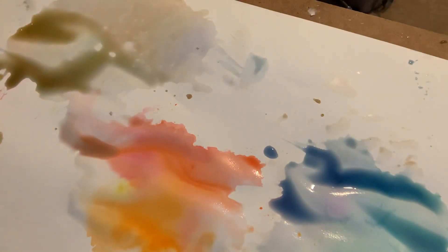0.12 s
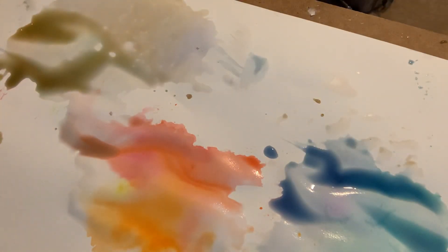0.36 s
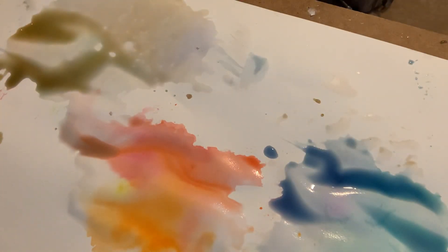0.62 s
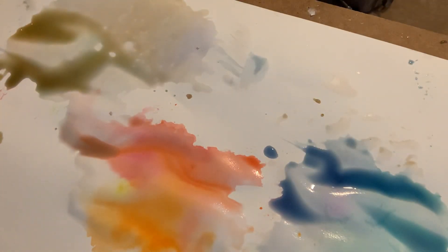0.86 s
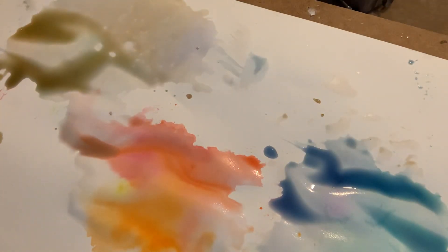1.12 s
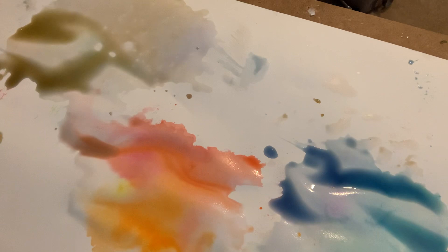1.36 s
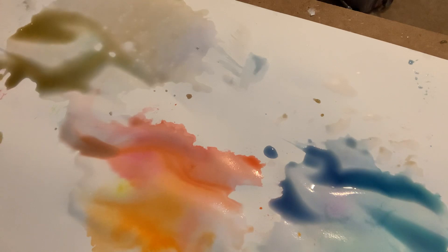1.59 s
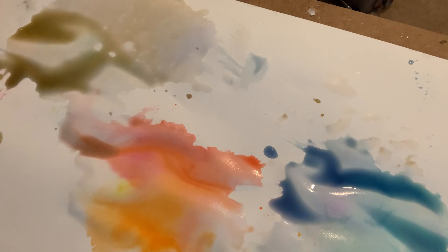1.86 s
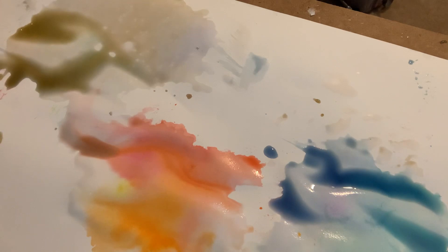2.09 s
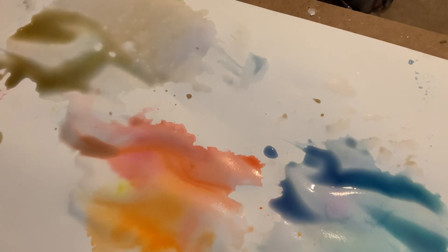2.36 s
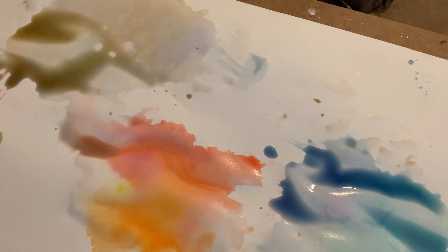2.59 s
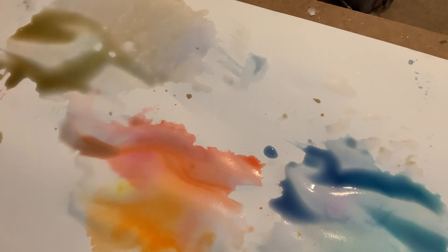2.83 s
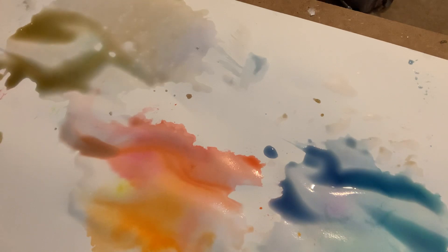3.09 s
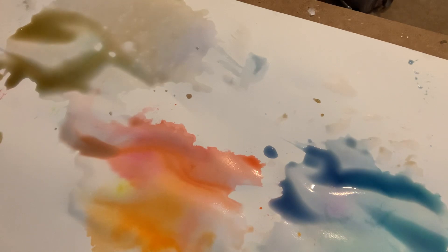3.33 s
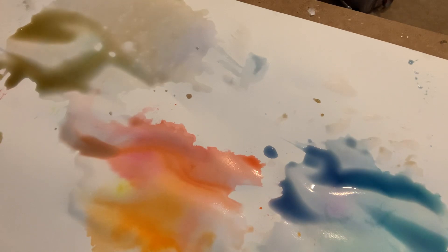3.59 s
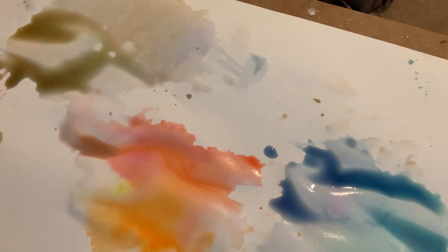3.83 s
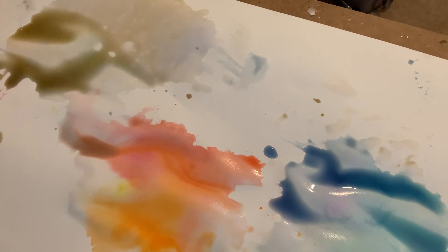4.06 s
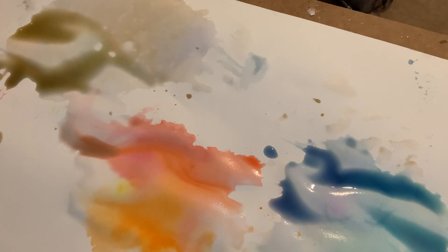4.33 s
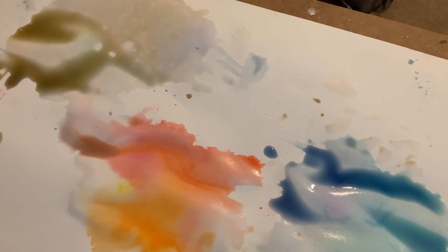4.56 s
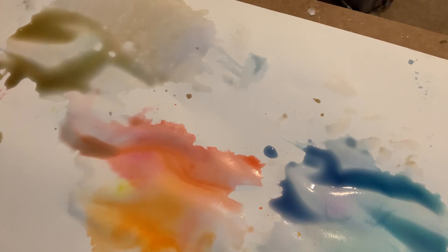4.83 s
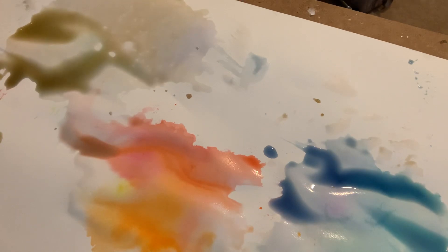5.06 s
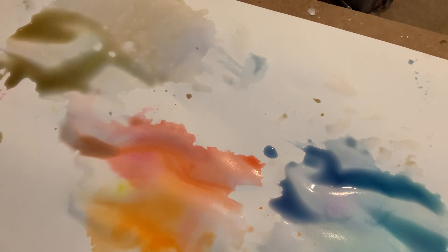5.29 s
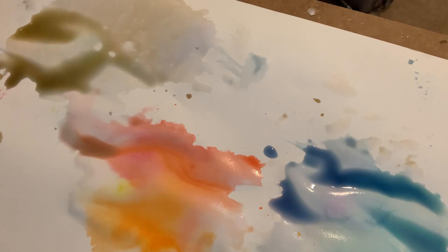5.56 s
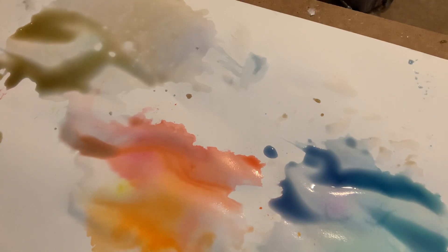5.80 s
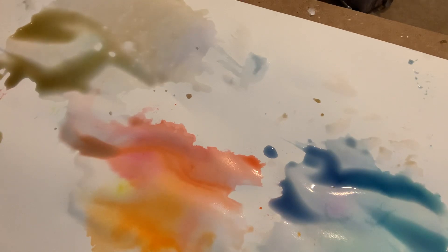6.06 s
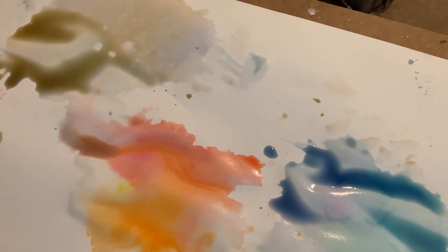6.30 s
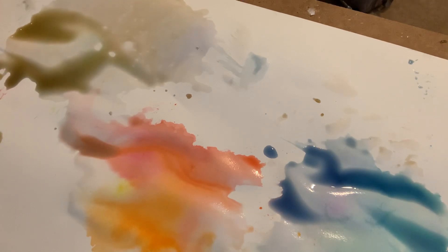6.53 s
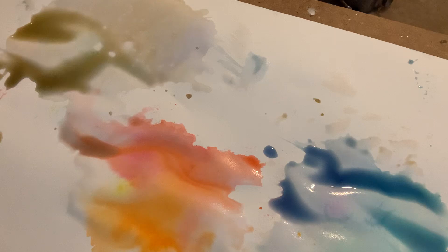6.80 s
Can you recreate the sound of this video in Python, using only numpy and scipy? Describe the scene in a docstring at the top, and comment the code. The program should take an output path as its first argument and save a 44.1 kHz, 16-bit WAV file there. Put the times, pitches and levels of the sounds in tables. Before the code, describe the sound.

Paper is handled on a desk in a small quiet room. Soft, broken rustles and sharp crease snaps come first, with near-silent gaps between them. A longer, busier shuffle follows in the middle with low desk knocks, then a strong, sustained rubbing scrape with snaps closes it. Close stereo pickup, source slightly right, short room tail.

```python
"""Paper shuffled on a desk

Sheets of paper are shuffled, slid and flicked in a small quiet room, to the right of a microphone pair.
Sliding fibres hiss and crackle (shaped noise), and creases snap (bursts of clicks).
The desk booms under the hand (ringing tones), and the room answers each snap with a short tail.
Behind them lie a low rumble, which follows the rubbing, and faint air noise.
"""
import sys
import numpy as np
from scipy import signal
from scipy.fft import irfft
from scipy.io import wavfile
from scipy.ndimage import uniform_filter1d

SR = 44100
rng = np.random.default_rng(int(sys.argv[2]) if len(sys.argv) > 2 else 0)


def elevation(decibels):
    """Turn decibel levels (scalar or array-like) into linear amplitude ratios."""
    levels = np.asarray(decibels, float)
    return 10 ** (levels / 20)


def dump(signal):
    """Clip the signal to [-1, 1] and save it as 16-bit WAV at the path in sys.argv[1]."""
    limited = np.clip(np.atleast_2d(signal).T, -1, 1)
    pcm = np.round(limited * 32767).astype(np.int16)
    wavfile.write(sys.argv[1], SR, pcm)


N = 304731  # length in samples

# how strongly the hand rubs the paper, one list a movement: start_s, level_db (relative)
HAND_MOVES = [
    [(0.0, -73), (0.1, -87), (0.2, -75), (0.3, -90.5)],
    [(0.38, -57.5), (0.5, -62.5), (0.578, -58), (0.8, -56.5), (0.992, -46), (1.044, -62.5), (1.18, -83.5)],
    [(1.33, -57.5), (1.376, -62.5), (1.41, -59.5), (1.5, -68.5), (1.6, -73)],
    [(1.72, -43), (1.76, -54), (1.862, -71.5), (1.95, -100)],
    [(2.016, -69.5), (2.104, -66.5), (2.274, -78), (2.31, -81)],
    [(2.354, -60), (2.44, -65), (2.6, -51.5), (2.654, -58.5), (2.862, -60), (2.898, -54), (3.03, -59),
     (3.154, -58.5), (3.234, -58.5), (3.31, -48.5), (3.38, -56), (3.41, -64.5), (3.58, -73), (3.63, -81.5)],
    [(3.74, -78), (3.91, -77), (3.94, -66.5), (4.04, -68.5), (4.16, -81.5)],
    [(4.33, -65.5), (4.36, -48.5), (4.43, -43.5), (4.49, -51), (4.54, -50), (4.61, -45), (4.65, -54.5),
     (4.72, -46.5), (4.83, -53.5), (4.87, -48), (5.0, -45.5), (5.04, -50), (5.14, -51.5), (5.34, -49),
     (5.49, -63.5)],
    [(5.51, -53), (5.58, -63), (5.66, -58.5), (5.84, -70), (5.86, -60), (5.9, -72.5)],
    [(5.97, -39), (6.03, -35.5), (6.204, -30.5), (6.262, -34.5), (6.38, -39.5), (6.41, -35), (6.43, -40),
     (6.504, -32.5), (6.6, -34), (6.65, -32.5), (6.68, -45), (6.73, -50.5), (6.785, -47), (6.823, -52.5),
     (6.84, -44.5), (6.867, -51.5), (6.91, -52)],
]
# low flex of the sheet, raising or lowering its bass: start_s, level_db (relative)
LOW_FLEX = [(0.0, -2), (0.47, -1.5), (0.6, -14.5), (0.75, -22), (0.95, -19), (1.05, -5), (1.5, -4),
            (1.71, -7), (2.1, -13), (2.4, -2.5), (2.8, -10), (2.9, 0), (3.02, -14), (3.15, -1.5),
            (3.23, -10.5), (3.36, 0.5), (4.1, -8.5), (4.38, -4), (4.6, -2), (4.87, -8), (4.95, 0),
            (5.25, -8.5), (5.36, 0), (5.7, -10), (5.97, -4), (6.2, -6), (6.3, -8.5), (6.41, -8.5),
            (6.6, -10), (6.91, -2)]


def evened(x):
    """Scales a sound to an rms of 1."""
    return x / np.sqrt(np.mean(x ** 2) + 1e-20)


def over_time(points, t):
    """Reads a curve of (second, value) rows at times t."""
    return np.interp(t, *np.transpose(points))


def over_pitch(points, hz):
    """Reads a curve of (Hz, value) rows on a log-frequency axis."""
    f, value = np.transpose(points)
    return np.interp(np.log(hz + 1), np.log(f + 1), value)


def above(hz, edge_hz):
    """Rises smoothly from 0 well below edge_hz to 1 well above it."""
    return 1 / (1 + (edge_hz / (hz + 1)) ** 4)


def colour(x, gain, size):
    """Cuts a sound into short overlapping pieces and weights their spectra by gain(hz, t)."""
    overlap = size * 3 // 4
    hz, t, z = signal.stft(x, SR, nperseg=size, noverlap=overlap)
    _, shaped = signal.istft(z * gain(hz[:, None], t), SR, nperseg=size, noverlap=overlap)
    return shaped[..., :x.shape[-1]]


def add(mix, start_s, sound):
    """Mixes a sound in from start_s on."""
    part = mix[round(start_s * SR):][:len(sound)]
    part += sound[:len(part)]


def rubbing(grains_per_s=3000, spread_db=4.5, grain_share=0.33, patchy_db=2.45):
    """Fibre hiss and tiny slips, coloured by a flexing sheet whose resonances drift."""
    # tone of sliding paper before treble and flex are applied: pitch_hz, level_db (per Hz, relative)
    sheet = [(50, -28), (150, 9.5), (250, 8.5), (400, 10), (780, 15.5), (1200, 11), (2000, 7), (3200, 7),
             (5000, 3.5), (7500, 8.5), (10300, 11), (12500, 5.5), (15500, 10.5)]
    # treble added to that tone: start_s, level_db (relative)
    treble = [(0.0, -15), (0.38, -20.5), (0.696, -7.5), (0.88, -9.5), (0.99, -17.5), (1.06, -12),
              (1.33, -24), (1.39, -17.5), (1.72, -18.5), (1.82, -38), (2.1, -12.5), (2.35, -14),
              (2.44, -23), (2.6, -13.5), (2.95, -8), (3.1, -21), (3.24, -7.5), (3.42, -25.5), (3.7, -11.5),
              (3.93, -21), (4.2, -8), (4.36, -16), (4.49, -3), (4.54, -17), (4.66, -9), (4.8, -20),
              (4.9, -8), (5.0, -21), (5.25, -5.5), (5.51, -26), (5.66, -10), (5.86, -11), (6.1, -13.5),
              (6.28, -10.5), (6.57, -4.5), (6.79, -24), (6.91, -37)]
    happens = rng.random(N) < grains_per_s / SR
    sizes = elevation(spread_db * np.minimum(rng.exponential(1, N), 3)) * happens
    slip_s = 0.0007  # dying time of one slip
    slips = signal.lfilter([1], [1, -np.exp(-1 / (slip_s * SR))], sizes) * rng.standard_normal(N)
    fibres = rng.standard_normal(N)
    drive = np.sqrt(1 - grain_share) * fibres + np.sqrt(grain_share) * evened(slips)

    # random map over time and pitch, smoothed both ways: the drifting resonances
    patches = rng.standard_normal((N // 128 + 9, 257))
    patches = uniform_filter1d(patches, size=12, axis=0)
    patches = evened(uniform_filter1d(patches, size=4, axis=1)).T

    def shape(hz, t):
        bright_db = over_time(treble, t) * above(hz, 6160)
        weight_db = over_time(LOW_FLEX, t) * (1 - above(hz, 1420))
        return elevation(over_pitch(sheet, hz) + bright_db + weight_db + patchy_db * patches[:, :len(t)])
    hand_db = over_time(np.vstack(HAND_MOVES), np.arange(N) / SR)
    return colour(drive, shape, size=512) * elevation(hand_db)


def snaps(clicks_per_s=2500, thin_db=-22, crest=3.31):
    """Each snap is a sharp click and a dying run of smaller ones; a thin sheet sends out little bass."""
    # creases snapping and edges slapping; tone levels are relative:
    # start_s, peak_db (approximate), body_db at 850 Hz, crack_db at 5 kHz, treble_db at 12 kHz
    creases = [(0.367, -53, 8, 2, -21), (1.197, -57, 28, -21, -20), (1.238, -23, 2, -7, -16.5),
               (1.253, -31.5, 3, -4.5, -20), (1.422, -36.5, -5, -37, -38), (1.576, -54, 12, -3, -13),
               (1.631, -30, 2.5, -5, -26), (1.659, -19, 7, -0.5, -9), (1.673, -31.5, -7, -23.5, -23),
               (1.718, -30.5, 1.5, -11, -18), (2.012, -57, -0.5, -3, -13), (2.344, -51, -15, 2, -9),
               (2.458, -30, -5, -10.5, -39), (2.539, -29, 6.5, -4, -14), (2.886, -38.5, -8, -19, -19),
               (3.144, -42.5, 12, -10, -23), (3.266, -32.5, -4, -5.5, -11), (3.375, -48, 3, -14, -22),
               (4.35, -34.5, -9, -7, -18), (4.419, -48, -11, 9, -22), (4.723, -33, -15, -16, -22),
               (4.929, -32, -2.5, -31, -19), (4.996, -26, -19, -15, -40), (5.078, -36, -9, -20, -19),
               (5.5, -43, 0, -16, -32), (5.933, -42.5, 2, -8, -18), (6.195, -21.5, -1, -12, -14),
               (6.408, -22.5, -8, 5, -28), (6.561, -16.5, 5, 17, 3), (6.835, -33.5, -2, -7, -25),
               (6.893, -38, -9, 14, -6)]
    out, t = np.zeros(N), np.arange(4096) / SR
    hz = np.fft.rfftfreq(8192, 1 / SR)
    for start_s, peak_db, body_db, crack_db, treble_db in creases:
        # 4.3 ms at -20 dB, doubling for every 29 dB fainter
        dying_s = 0.0043 * 2 ** ((-20 - peak_db) / 29)
        chance, size = rng.random(4096), rng.standard_normal(4096)
        clicks = size * (chance < clicks_per_s / SR) * np.exp(-t / dying_s)
        clicks[0] = 1.78  # the first sharp click
        tone_db = over_pitch([(300, body_db + thin_db), (850, body_db), (2000, 0.0055),
                              (3500, 0.58 * crack_db + 1), (5000, crack_db),
                              (12000, treble_db), (16000, treble_db - 19)], hz)
        # minimum phase: the sheet answers at once, never ahead of the click
        log_gain = np.log(elevation(tone_db))
        mirrored = np.r_[log_gain, log_gain[-2:0:-1]]
        answer = irfft(np.exp(np.conj(signal.hilbert(mirrored))[:4097]))
        snap = signal.fftconvolve(clicks, answer[:1024])
        start_rms = np.linalg.norm(snap) / np.sqrt(dying_s * SR / 2)
        add(out, start_s, elevation(peak_db) / crest * snap / start_rms)
    return out


def knocks(width=0.32):
    """A soft, uneven push rings the desk modes that lie near its centre pitch (width in octaves)."""
    # hand and stack pressing the desk: start_s, peak_db (relative), centre_hz, length_ms (dying time)
    presses = [(0.985, -48, 61.9, 22), (1.265, -50.5, 310, 14), (1.455, -47, 318, 18),
               (1.709, -44, 314, 22), (1.75, -44.5, 310, 9.1), (1.7, -57, 58, 20), (2.591, -52, 64, 20),
               (4.573, -30.5, 186, 12), (4.604, -27.5, 195, 36), (4.93, -45, 50, 25), (4.974, -46, 56, 20),
               (5.506, -47, 127, 80), (6.171, -53, 319, 18), (6.638, -36.5, 320, 20)]
    # tones at which the desk rings: pitch_hz, level_db (relative), t60_s (time to fall by 60 dB)
    desk = [(54, -4, 0.25), (122, 0, 0.19), (158, 0.5, 0.24), (180.3, -7.5, 0.26), (203.4, 6, 0.18),
            (262, -8, 0.17), (306.7, 1.5, 0.26), (314.5, 0.5, 0.22), (335, -22, 0.4)]
    out, t = np.zeros(N), np.arange(SR // 2) / SR
    for start_s, peak_db, centre_hz, length_ms in presses:
        push = rng.standard_normal(4096) * np.exp(-t[:4096] / (length_ms / 1000))
        push[0] += 40  # first contact
        ring = 0
        for hz, level_db, t60 in desk:
            off_centre_db = 4 * (np.log2(hz / centre_hz) / width) ** 2
            ring = ring + elevation(level_db - off_centre_db - 60 * t / t60) * np.sin(2 * np.pi * hz * t)
        knock = signal.fftconvolve(push, ring)
        add(out, start_s, elevation(peak_db) * knock / abs(knock).max())
    return out


def room(x, turns_per_s=9.0, count=5):
    """Sparse reflections of random sign, each band dying at its own speed, in tails that take turns."""
    # how long the room rings: pitch_hz, t60_s (time to fall by 60 dB)
    ringing = [(200, 0.32), (800, 0.25), (2000, 0.18), (5000, 0.36), (12000, 0.066)]
    length = SR // 2
    taps = np.zeros((count, 2, length))
    # one reflection at a random place in every 20 samples
    at = np.arange(60, length - 20, 20) + rng.integers(0, 20, (count, 2, (length - 61) // 20))
    np.put_along_axis(taps, at, rng.choice([-1., 1.], at.shape), 2)
    tails = colour(taps, lambda hz, t: above(hz, 120) * elevation(-60 * t / over_pitch(ringing, hz)), size=256)
    # the desk and near wall answer first and loudest
    tails *= 1 + 0.79 * np.exp(-np.arange(length) / (0.0073 * SR))
    # the tails take turns at a steady pace, so that no single pattern of reflections colours the hiss
    turn = np.pi * turns_per_s * np.arange(N) / SR
    out = 0
    for k, tail in enumerate(tails):
        sent = x * np.sqrt(2 / count) * np.cos(turn + np.pi * k / count)
        out = out + signal.fftconvolve(sent[None], tail / np.linalg.norm(tail[0]), axes=1)[:, :N]
    return out


def rumble():
    """The desk rumbles with the low flex, nearly the same on both sides and stronger left."""
    # tone of the rumble: pitch_hz, level_db (per Hz, relative)
    rumble_tone = [(25, -22), (45, 9), (80, -1), (130, -4.5), (250, -16.5), (500, -45)]
    lag_s, smooth_s = 0.036, 0.08
    t = np.arange(N) / SR - lag_s
    flex_db = over_time(np.vstack(HAND_MOVES), t) + over_time(LOW_FLEX, t)
    flex_db = uniform_filter1d(flex_db, round(smooth_s * SR))
    low = rng.standard_normal(N) + 0.32 * rng.standard_normal((2, N))  # common part + own parts
    low = evened(colour(low, lambda hz, t: elevation(over_pitch(rumble_tone, hz)), size=4096))
    resting = elevation(-73.5)
    following = elevation(-50.5 + 0.74 * (flex_db + 41))  # 0.74 dB for each dB of flex
    return low * np.hypot(resting, following) * elevation([[2], [-2.5]])  # left, right in dB


def air():
    """The faint air of the room: steady shaped noise, separate on each side."""
    # tone of the air: pitch_hz, level_db (per Hz, relative)
    air_tone = [(70, -29.5), (200, 4), (1000, -11), (2500, -7.5), (6000, -16.5), (15000, -20)]
    noise = rng.standard_normal((2, N))
    return elevation(-76.5) * evened(colour(noise, lambda hz, t: elevation(over_pitch(air_tone, hz)), size=1024))


def scene():
    """Direct sound reaches the right side first; snaps wake the room more than the close hiss."""
    hiss, hits, booms = rubbing(), snaps(), knocks()
    near = hiss * elevation(1.5) + hits + booms
    lag = 20  # samples by which the left side hears later
    direct = np.array([np.r_[np.zeros(lag), near[:-lag]], near])
    into_room = hiss * elevation(1) + hits * elevation(9.5) + booms * elevation(-2.0)
    return direct + room(into_room) + rumble() + air()


def suppress(x, quiet_db=-66, slope=0.44, most_db=8):
    """Noise suppression: the fainter the sound above the bass, the more it is turned down."""
    upper = colour(x, lambda hz, t: above(hz, 400), size=1024)
    power = uniform_filter1d((upper ** 2).mean(0), size=600)
    power_db = 10 * np.log10(abs(power) + 1e-12)
    cut_db = np.clip(slope * (quiet_db - power_db), 0, most_db)
    return x - upper + upper / elevation(cut_db)


def microphone_range(x):
    """The microphones pass only part of the pitch range."""
    # what they let through: pitch_hz, level_db (gain)
    passed = [(30, -36.5), (48, 1.5), (14000, -1), (15600, -13.5), (15900, -61)]
    return colour(x, lambda hz, t: elevation(over_pitch(passed, hz)), size=2048)


def share_treble(x):
    """In the treble the right side takes over the left signal, its phase turned by pitch."""
    # how much of the left signal the right side carries: pitch_hz, share (0 to 1)
    shared = [(6000, 0), (7400, .75), (8300, 1), (9600, 1), (10400, .85), (11500, .75), (12400, .85),
              (13000, 1)]
    # how far that part is turned: pitch_hz, turn_cycles
    phase_turn = [(6500, .65), (7600, .54), (8300, .5), (9600, .5), (10300, .44), (11200, .28),
                  (12400, .04), (13000, 0)]

    def turned_share(hz, t):
        return over_pitch(shared, hz) * np.exp(2j * np.pi * over_pitch(phase_turn, hz))
    left, right = x
    own = colour(right, lambda hz, t: np.sqrt(1 - over_pitch(shared, hz) ** 2), size=2048)
    return np.array([left, own + colour(left, turned_share, size=2048)])


def top_cut(x):
    """Nothing passes above the cut-off."""
    return signal.sosfilt(signal.butter(12, 16340, fs=SR, output="sos"), x)


def record(dry):
    """Noise suppression, then the microphone range, then treble shared between the sides."""
    heard = microphone_range(suppress(dry))
    finished = share_treble(heard)
    return top_cut(finished)


dry = scene()
out = record(dry)
dump(out)
```